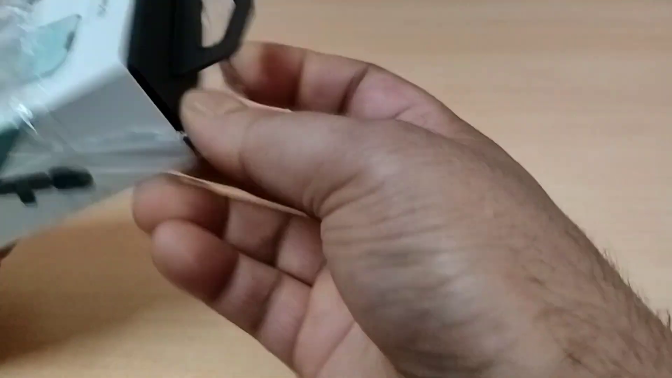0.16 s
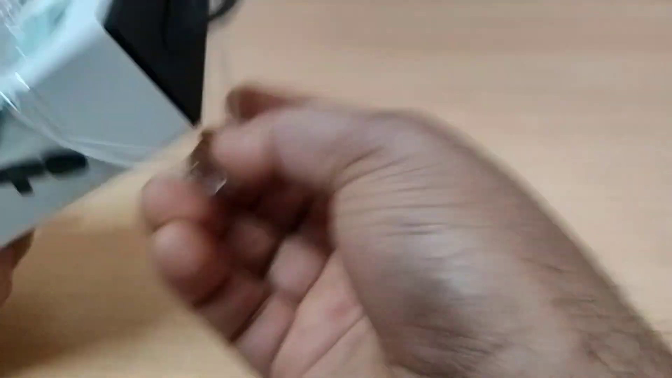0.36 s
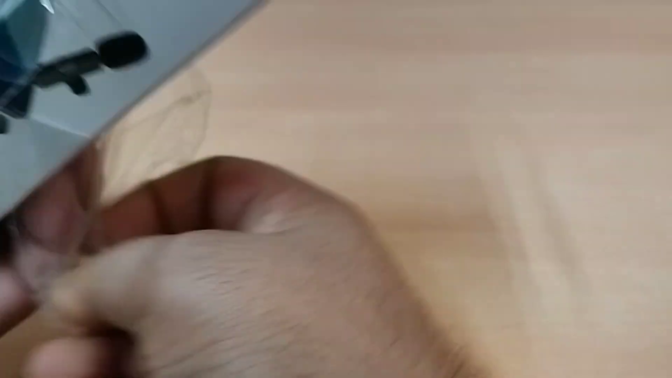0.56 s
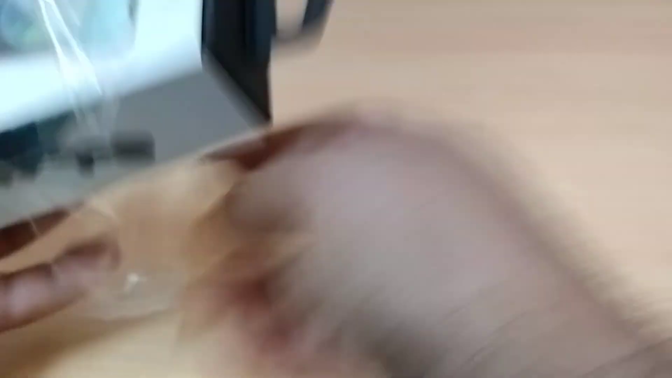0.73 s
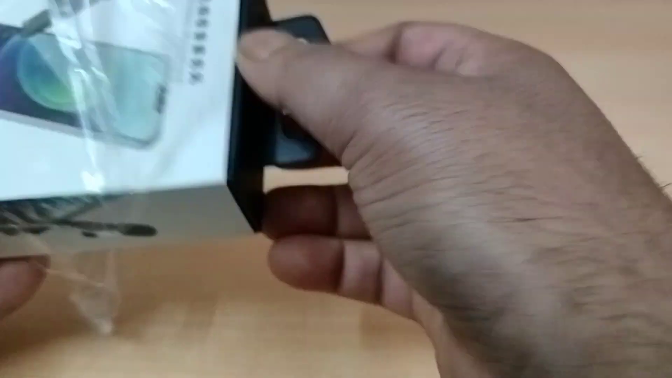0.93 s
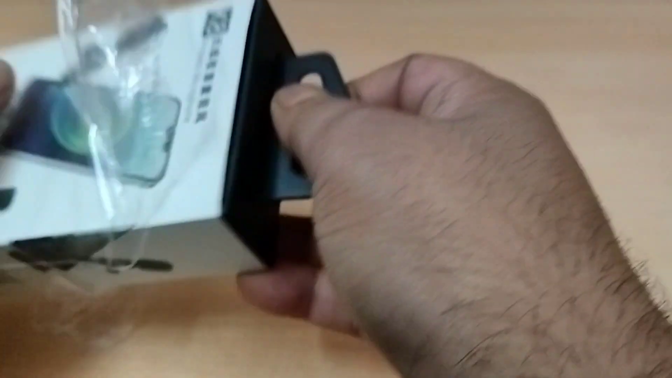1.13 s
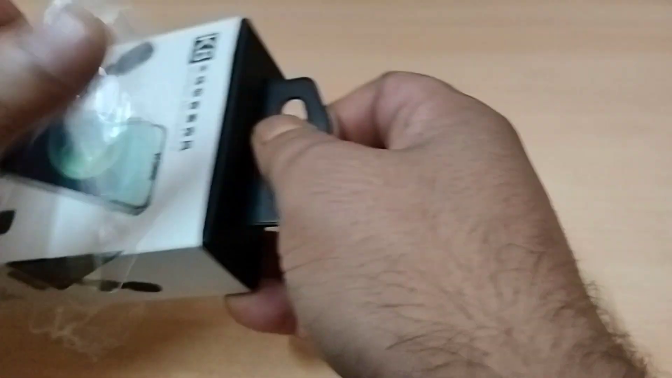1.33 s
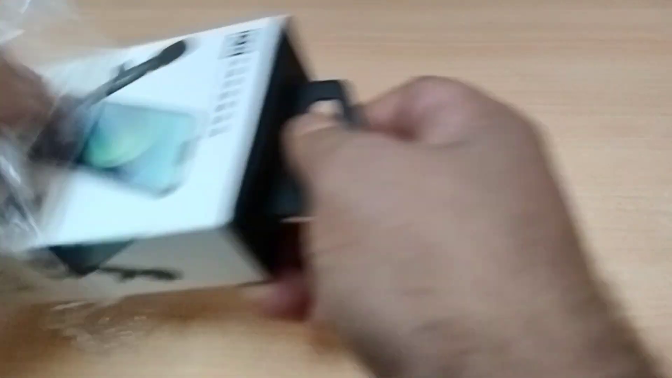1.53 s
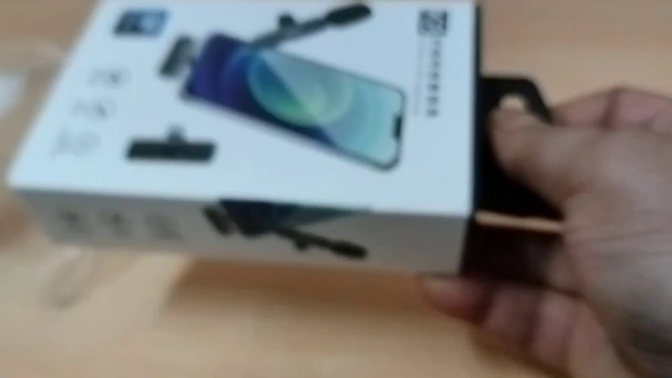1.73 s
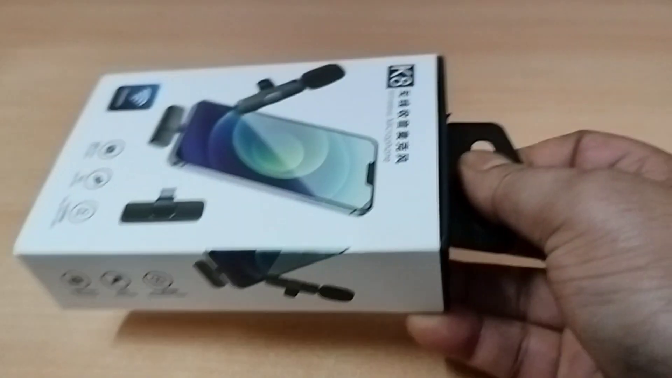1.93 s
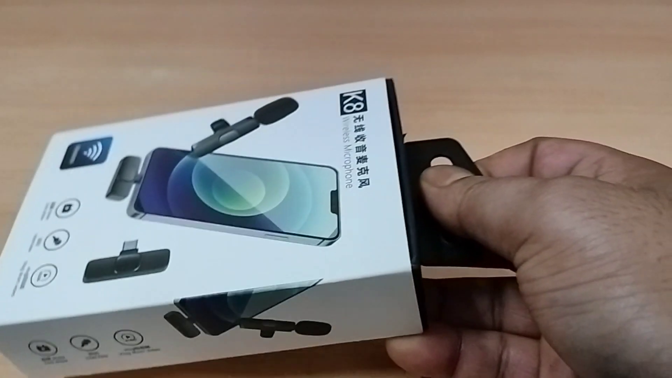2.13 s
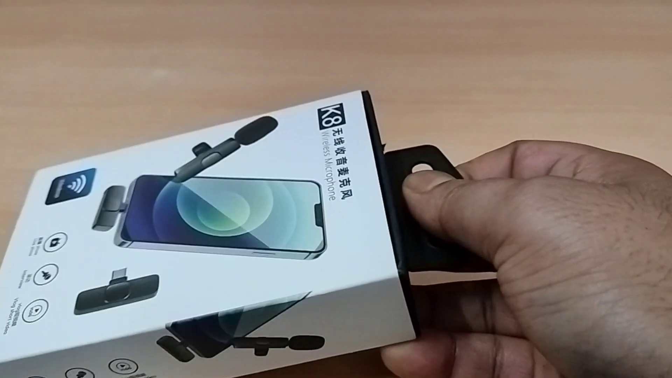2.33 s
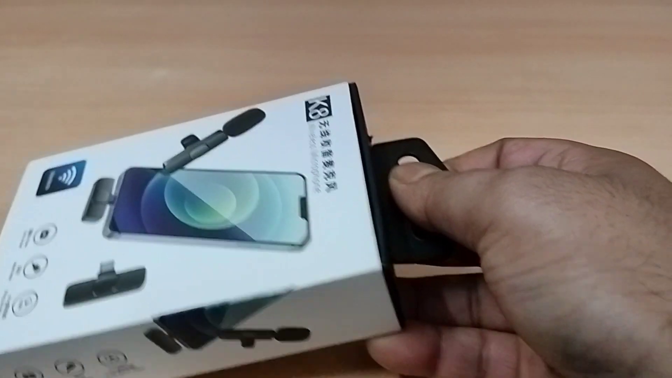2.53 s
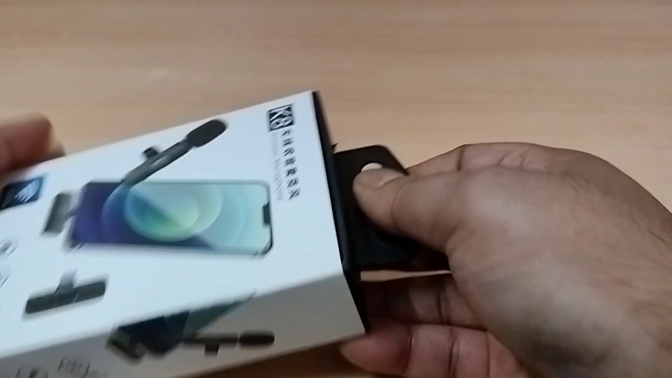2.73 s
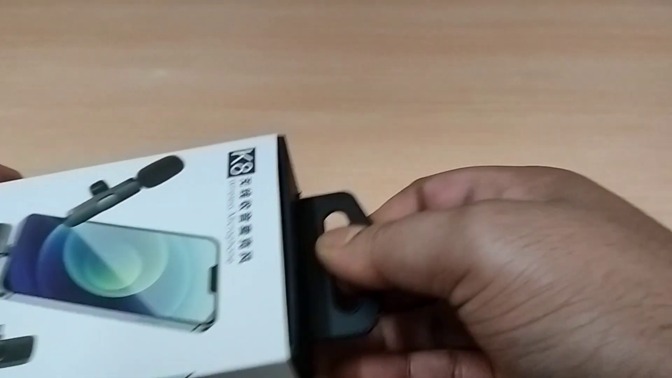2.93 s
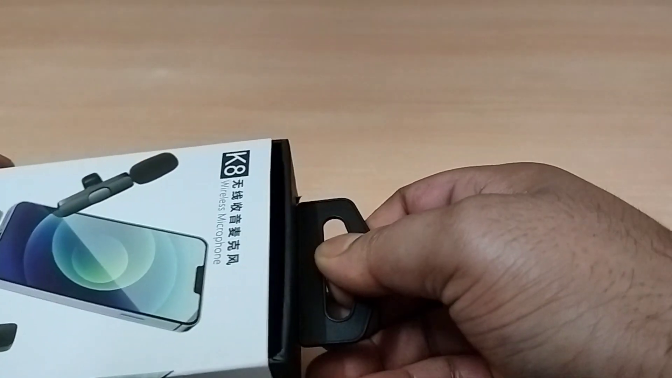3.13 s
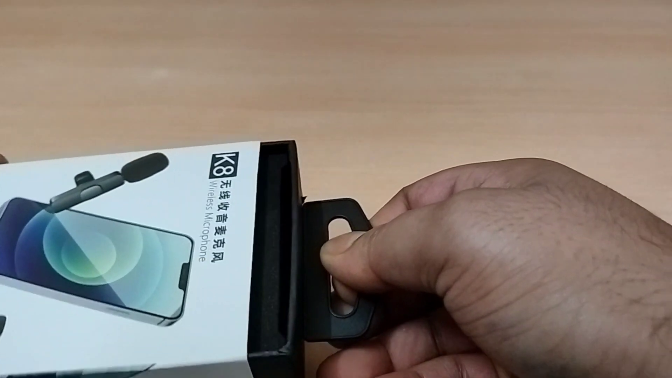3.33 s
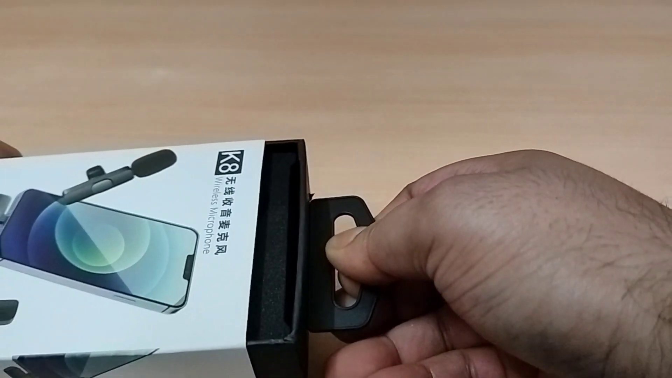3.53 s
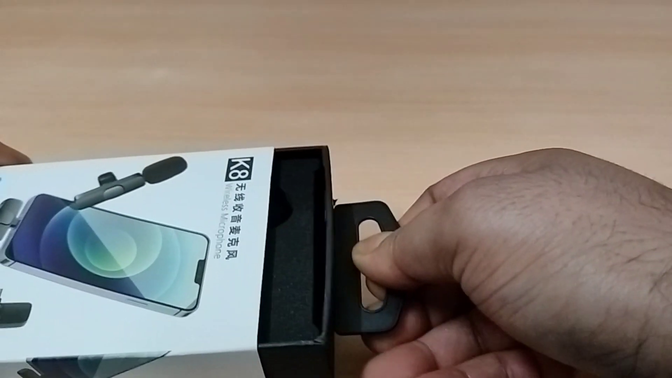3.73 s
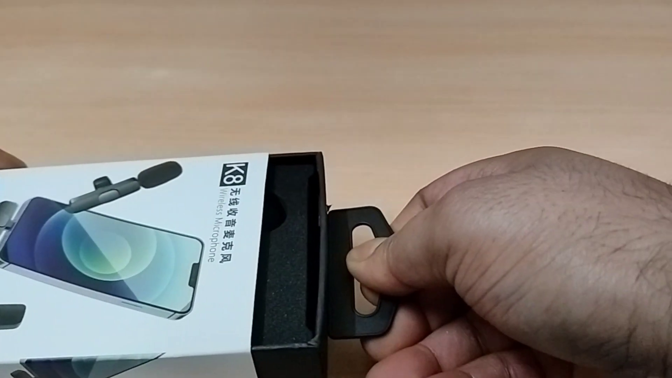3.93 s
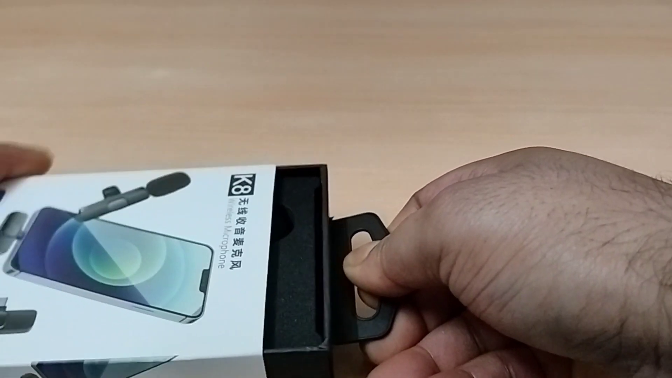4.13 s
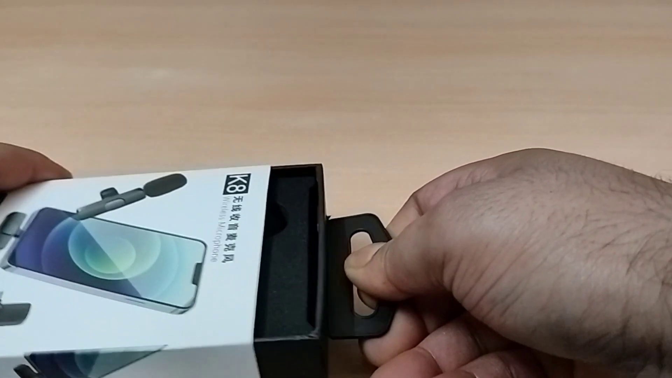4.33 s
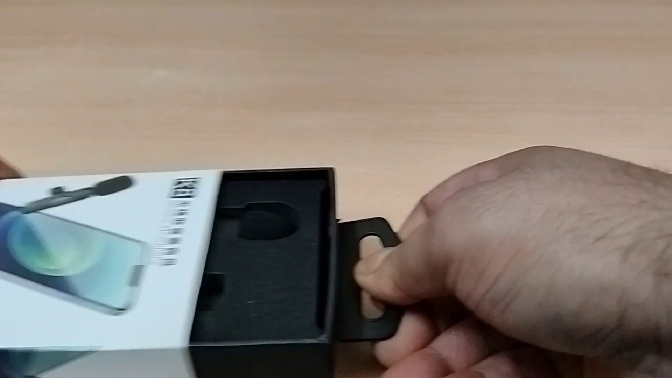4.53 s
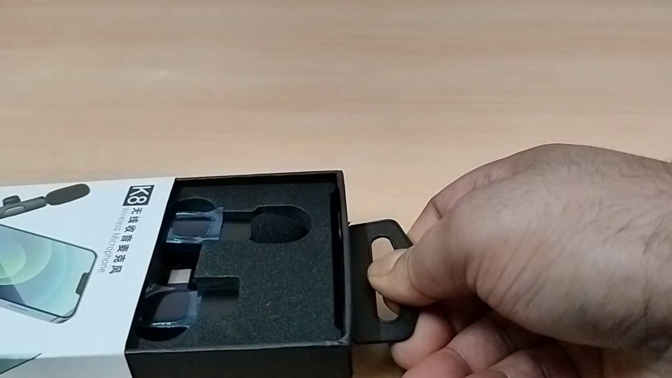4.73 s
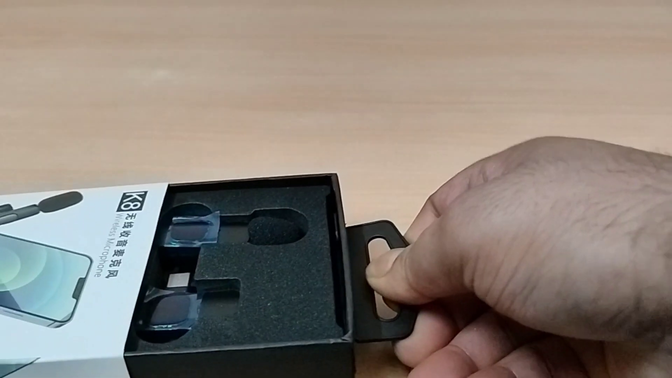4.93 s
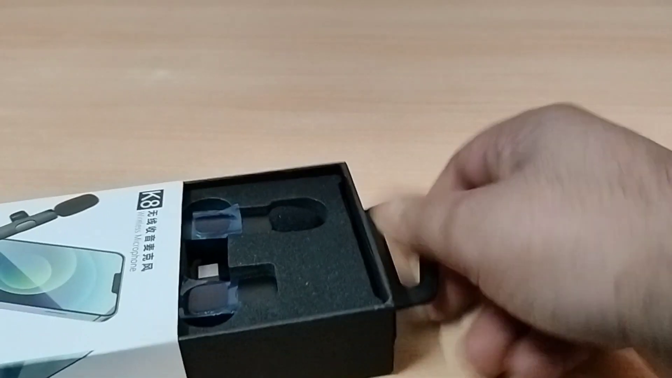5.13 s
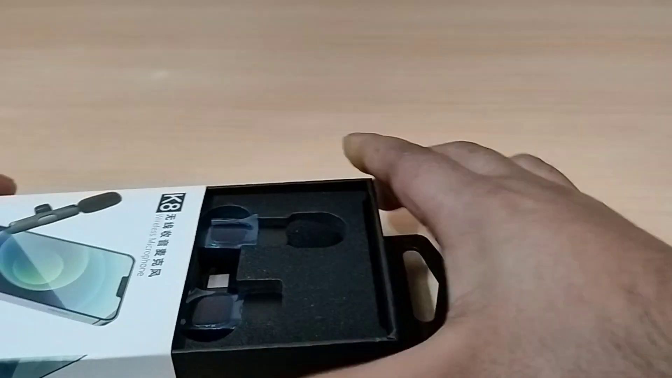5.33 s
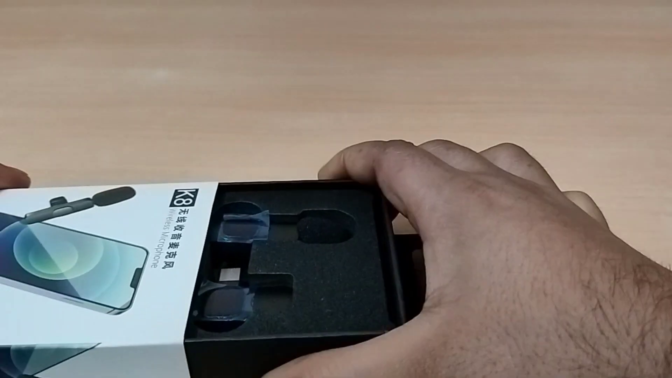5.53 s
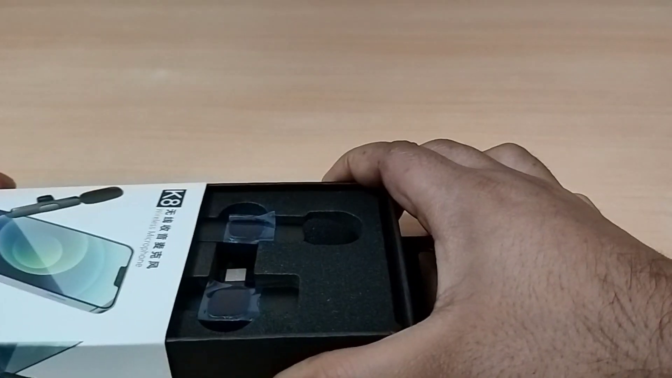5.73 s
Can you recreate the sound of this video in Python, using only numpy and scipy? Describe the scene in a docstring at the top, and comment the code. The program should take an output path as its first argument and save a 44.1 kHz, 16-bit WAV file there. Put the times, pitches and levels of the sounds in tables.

```python
"""Hands pull plastic wrap off a small cardboard box: the film crackles and snaps, and the box rings.
In the first second, puffs of air buffet the right microphone port. From 1.5 s the box bumps the table.
From 2.8 s the tray rasps out of its sleeve, with a faint deep throb under the first strokes, finger taps
on the cardboard and a thin whistle near 4 s. A fan motor hums in the quiet room throughout."""
import sys
import numpy as np
from scipy import signal
from scipy.fft import rfft, irfft
from scipy.io import wavfile

SR = 44100
rng = np.random.default_rng(int(sys.argv[2]) if len(sys.argv) > 2 else 0)


def unload_wav(signal):
    """Save mono or channel-first audio to the path in sys.argv[1] as 16-bit WAV at rate SR, clipped to [-1, 1]."""
    wavfile.write(
        sys.argv[1],
        SR,
        np.round(np.clip(np.atleast_2d(signal).T, -1, 1) * 32767).astype(np.int16),
    )


N = 254368
WRAP_PAN_DB, TRAY_PAN_DB, FAN_PAN_DB = -4.5, -5, -5.5   # left minus right: all sit a little to the right

# The bright tone of the film. Each row: frequency in Hz, level in dB.
FILM_SPECTRUM = [(1200, -44), (1900, -19.5), (2180, -8), (3000, -9), (3500, -6.5), (4960, -11), (5800, -10),
                 (6600, -23.5), (7500, -20.5), (16000, -19)]
# The hollow modes of the closed box. Each row: pitch in Hz, width in Hz, level in dB.
BOX_MODES = [(712, 78, 1.5), (982, 125, 4.5), (1174, 540, -2), (1900, 350, -13.5), (366, 230, -2),
             (231, 180, -5.5)]
# Handfuls of wrap. Each row: start in seconds, crackle in dB, fade in dB per second,
# box over crackle in dB.
CRUMPLES = [(0.0, -43, 46.5, -2.5), (0.27, -35.5, 306, 6.5), (0.371, -38, 122.5, -4.5),
            (0.42, -42.5, 96.5, -1), (0.49, -39, 59, -4), (0.534, -21, 178.5, -0.5),
            (0.585, -42.5, 137.5, 4), (0.692, -45, 43.5, 4.5), (0.834, -46.5, 260, 8.5),
            (0.93, -54.5, 45, 11.5), (1.24, -53, 88, 4.5), (1.395, -47.5, 259.5, 0.5), (1.49, -38, 60, -1),
            (1.595, -28.5, 119, -0.5), (1.66, -32.5, 101.5, 4), (1.763, -24.5, 296, -8.5),
            (1.95, -45, 110, -4), (2.263, -47.5, 135, 3), (2.301, -74.5, 32, 24.5)]


def wrap():
    """Crumpling film: one stream of uneven crinkles excites both its folds and the box under it."""
    t, rise_s = np.arange(N) / SR, 0.017
    film_power, box_power = 0, 0
    for start, db, fade_db, box_db in CRUMPLES:
        gain = np.clip((t - start) / rise_s, 0, 1) * from_db(db - fade_db * np.maximum(t - start, 0))
        film_power += gain ** 2
        box_power += (gain * from_db(box_db)) ** 2
    clicks = grains(3500, spread_db=0.5, clump_db=6.5, alike=0.31)
    # One fold creases at a time, for about 7 ms, and rings at a pitch of its own.
    active_fold = rng.integers(0, 7, N // 300 + 1).repeat(300)[:N]
    folds = sum(resonate(clicks * (active_fold == k), hz, width_hz=0.15 * hz) / np.sqrt(hz)
                for k, hz in enumerate(np.geomspace(2000, 6300, 7)))
    crinkle = rms_one(colour(rms_one(folds) + 1.2 * rms_one(clicks), FILM_SPECTRUM))
    crackle = soft_contact(crinkle, np.sqrt(film_power), full_db=-40, cut_hz=5760)
    hollow = np.sqrt(box_power) * rms_one(cardboard(clicks, BOX_MODES))
    return (hollow + crackle) * panned(WRAP_PAN_DB)


# Single snaps of the wrap. Each row: start in seconds, level in dB, film pitch in Hz, box send in dB.
SNAPS = [(0.009, -30, 2470, 10), (0.028, -12, 2747, -7.5), (0.068, -13, 2820, -4.5),
         (0.102, -18.5, 2770, -19.5), (0.137, -22.5, 3860, -11), (0.151, -20.5, 2368, -10.5),
         (0.28, -20, 3723, -8), (0.372, -27, 2453, 0.5), (0.381, -43.5, 5110, -15.5),
         (0.395, -26, 3580, -18.5), (0.422, -17, 3780, -6), (0.477, -23, 3520, -2.5),
         (0.493, -21, 4020, -6), (0.507, -16, 3900, 1), (0.525, -26, 4560, -9), (0.54, -1.5, 3880, -16),
         (0.578, -18, 2584, 3), (0.596, -12, 2600, -11), (0.681, -18.5, 3920, -13),
         (0.838, -22.5, 2600, -25), (0.972, -28, 5340, -29), (1.405, -29.5, 2674, -15.5),
         (1.495, -24.5, 2280, 5), (1.517, -16, 3800, -15), (1.533, -24, 4300, -22.5),
         (1.561, -15, 3047, -35), (1.574, -32.5, 2400, 2.5), (1.595, -4.5, 2806, -13),
         (1.603, -1.5, 3108, -6.5), (1.662, -18.5, 2440, 5), (1.688, -27.5, 2500, 9.5),
         (1.725, -32.5, 2510, 15), (1.738, -26.5, 2870, 12.5), (1.747, -22, 3370, -41),
         (1.78, -6.5, 2700, -9), (1.99, -30, 4070, -14), (2.28, -34.5, 3130, -13), (3.2, -46, 6650, -29)]


def snaps():
    """Each snap is a few cycles at the film's pitch, a broad crack and a knock into the box."""
    full_db, dull_hz = -5.5, 6300   # snaps weaker than full_db lose treble above dull_hz
    ping, hard, gentle, knock = np.zeros((4, 2, N))
    t = np.arange(600) / SR
    lagged = np.maximum(t - np.array([[0.00004], [0]]), 0)   # the left port is a little further away
    ping_shape = (1 - np.exp(-lagged / 0.00012)) * np.exp(-lagged / 0.0007)
    crack_shape = np.exp(-t / 0.00067) + 0.069 * np.exp(-t / 0.0046)   # sharp break, then splinters
    bursts = rng.standard_normal((len(SNAPS), 2, len(t)))
    bursts[:, :, 0] = 3.0   # the break itself is one hard click
    for (start, db, hz, box_db), burst in zip(SNAPS, bursts):
        gain = from_db(db) * panned(WRAP_PAN_DB)
        force = min(from_db(db - full_db), 1) ** 2
        place(ping, start, gain * np.sin(2 * np.pi * hz * lagged) * ping_shape)
        place(hard, start, force * gain * burst * crack_shape)
        place(gentle, start, (1 - force) * gain * burst * crack_shape)
        jolt = burst[0] + 0.11 * burst   # nearly the same at both ports
        place(knock, start, from_db(box_db) * gain * jolt * np.exp(-t / 0.0026))
    crack = colour(hard + butter(gentle, 4, dull_hz), FILM_SPECTRUM)
    return from_db(-0.5) * ping + from_db(7) * crack + from_db(12.5) * cardboard(knock, BOX_MODES)


# The dry tone of rubbed cardboard. Each row: frequency in Hz, level in dB.
SURFACE_SPECTRUM = [(1120, -40), (1900, -19.5), (2350, -15), (2680, -10.5), (3170, -16.5), (3600, -11),
                    (4580, -17.5), (5790, -17.5), (7500, -37.5), (9750, -58), (16500, -120)]
# The modes of the half-open sleeve. Each row: pitch in Hz, width in Hz, level in dB.
SLEEVE_MODES = [(950, 76, 7.5), (1300, 129, 1.5), (1806, 18, 0), (734, 97, -2.5)]
# Pulls on the tray. Each row: start in seconds, length in seconds, closing hiss level in dB,
# swell over the stroke in dB, sleeve ring over hiss in dB.
STROKES = [(2.818, 0.12, -55.5, 9.5, 4.5), (2.968, 0.02, -53, 12, 2), (3.142, 0.12, -56.5, 9.5, 2.5),
           (3.33, 0.079, -52, 0.5, 3.5), (3.474, 0.045, -58, -7.5, 2), (3.714, 0.095, -52, 1.5, 3.5),
           (3.847, 0.22, -80.5, -13.5, 9), (4.109, 0.063, -68.5, -1.5, 6.5), (4.183, 0.068, -70, -6, 8),
           (4.279, 0.053, -66.5, 5, 8), (4.385, 0.079, -75.5, 4.5, -1), (4.508, 0.2, -43.5, 8.5, 1.5),
           (4.877, 0.028, -55.5, 0, 1), (5.073, 0.094, -64.5, -3.5, -3.5), (5.186, 0.12, -74.5, 2.5, 3),
           (5.506, 0.036, -58.5, 6, 2.5), (5.707, 0.092, -46, 12, 4.5)]


def tray():
    """The tray grips, slides and lets go: dense fibre contacts hiss and ring the sleeve."""
    grip_s, let_go_s = 0.027, 0.0068
    t, hiss_gain, ring_gain = np.arange(N) / SR, 0, 0
    for start, length, db, swell_db, ring_db in STROKES:
        edges = np.clip((t - start) / grip_s, 0, 1)
        edges *= np.exp(-np.maximum(t - start - length, 0) / let_go_s)
        gain = edges * from_db(db - swell_db * np.clip(1 - (t - start) / length, 0, 1))
        hiss_gain += gain
        ring_gain += gain * from_db(ring_db)
    clicks = grains(14000, spread_db=0, clump_db=1.2, alike=0.37)
    ring = butter(cardboard(clicks, SLEEVE_MODES), 3, 680, "high")
    hiss = soft_contact(rms_one(colour(clicks, SURFACE_SPECTRUM)), hiss_gain, full_db=-46, cut_hz=4800)
    return (ring_gain * rms_one(ring) + hiss) * panned(TRAY_PAN_DB)


# Fingers on the cardboard. Each row: start in seconds, ring level in dB, pitch in Hz, tick level in dB.
TAPS = [(2.87, -38, 890, -61), (2.884, -35, 826, -53.5), (2.908, -33, 880, -43.5), (2.922, -27.5, 774, -42),
        (3.336, -43, 900, -50), (3.734, -42.5, 920, -46.5), (3.808, -38.5, 1300, -45),
        (3.878, -39, 830, -69.5), (4.205, -50.5, 1290, -53.5), (4.236, -57, 1360, -71),
        (4.588, -31.5, 964, -55), (4.863, -44.5, 995, -63.5), (5.171, -47, 926, -67),
        (5.277, -55, 864, -67), (5.531, -46.5, 950, -56.5), (5.715, -40, 987, -62)]


def taps():
    """A fingertip makes a dull, dry tick and briefly rings two modes of a cardboard panel."""
    rise_s, ring_s, tick_s = 0.00076, 0.0038, 0.0022
    overtone_ratio, overtone_db = 1.722, -10.5
    out, t = np.zeros(N), np.arange(900) / SR
    grit = rng.standard_normal((len(TAPS), len(t))) * np.exp(-t / tick_s)
    ticks = butter(colour(grit, SURFACE_SPECTRUM)[:, :len(t)], 4, 3900)
    for (start, db, hz, tick_db), tick in zip(TAPS, ticks):
        phase = 2 * np.pi * hz * t
        modes = np.sin(phase) + from_db(overtone_db) * np.sin(overtone_ratio * phase)
        ring = modes * (1 - np.exp(-t / rise_s)) * np.exp(-t / ring_s)
        place(out, start, from_db(db) * ring / ring.max() + from_db(tick_db) * tick / np.abs(tick).max())
    return out * panned(TRAY_PAN_DB)


# Soft thuds. Each row: start in seconds, level in dB, pitch in Hz, left minus right in dB.
BUMPS = [(1.486, -33, 361, 1), (1.52, -34, 184, -6), (1.548, -35, 174, -4), (1.597, -30, 226, -8),
         (1.631, -30, 290, 2), (1.661, -34.5, 311, -12.5), (1.772, -24, 240, -1.5), (1.887, -47, 168, -19),
         (4.311, -45.5, 245, -4)]


def bumps():
    """The box bumps the table with a few dull, low cycles."""
    out = np.zeros((2, N))
    for start, db, hz, pan_db in BUMPS:
        place(out, start, soft_pulse(db, hz, cycles=2.5) * panned(pan_db))
    return out


# The fader ride of the turbulence. Each row: time in seconds, level in dB.
TURBULENCE_LEVELS = [(0.22, -65), (0.246, -31.5), (0.528, -28.5), (0.55, -18.5), (0.842, -32), (0.95, -51)]
# Single puffs of air. Each row: start in seconds, level in dB, pitch in Hz.
PUFFS = [(0.253, -13, 106), (0.3, -20.5, 113), (0.345, -16, 118), (0.419, -30, 210), (0.448, -7.5, 174),
         (0.546, -8, 139), (0.574, -20, 162), (0.586, -6.5, 206), (0.606, -2, 190), (0.625, -9, 232),
         (0.642, -16.5, 153), (0.716, -14, 145), (0.732, -17.5, 134), (0.797, -12, 142),
         (0.814, -15.5, 118)]


def air():
    """Air buffets the right port: lumpy low turbulence and puffs of a cycle or two."""
    lumps = rng.standard_normal(N) * from_db(3 * drift(25))
    out = rms_one(butter(lumps, 2, [70, 240], "band")) * automation(TURBULENCE_LEVELS)[0]
    for start, db, hz in PUFFS:
        place(out, start, soft_pulse(db, hz, cycles=1.05))
    return out * [[0.01], [1]]


# The fader ride of the whistle. Each row: time in seconds, level in dB.
WHISTLE_LEVELS = [(3.84, -79), (4.22, -81)]


def whistle():
    """A faint thin whistle: noise passed twice through one narrow resonance."""
    hz, width_hz = 3780, 220
    once = resonate(rng.standard_normal((2, N)), hz, width_hz)
    return automation(WHISTLE_LEVELS)[0] * rms_one(resonate(once, hz, width_hz))


# A swell of sub-bass. Each row: start in seconds, level in dB, pitch in Hz.
THROB = [(2.7, -59, 39.7)]


def throb():
    """One deep tone swells and passes in the centre."""
    out = np.zeros(N)
    for start, db, hz in THROB:
        place(out, start, soft_pulse(db, hz, cycles=11))
    return out


# The motor's chord. Each row: multiple of the turning rate, level against the hum in dB.
MOTOR_LINES = [(7, -21.5), (9, -14), (10, -17), (12, -6), (13, -6), (16, -20), (18, -22)]
# The tone of the rumble before its upper lift. Each row: frequency in Hz, level in dB.
RUMBLE_SPECTRUM = [(15, -54), (25, -33.5), (45, -12), (80, -18), (170, -9), (300, -7), (400, -7.5),
                   (520, -15), (720, -10.5), (950, -13), (1960, -27.5), (3790, -35), (7000, -56.5),
                   (9100, -95)]
# The rumble is narrow in the bass, wide on top. Each row: frequency in Hz, left-right likeness (0 to 1).
RUMBLE_LIKENESS = [(60, 0.97), (290, .82), (640, 0.44), (1400, 0.03), (6000, .02)]
# The bed swells and fades. Each row: time in seconds, hum in dB, rumble in dB, deepest motor line in dB.
FAN_LEVELS = [(0.0, -53.5, -43, -56.5), (0.65, -41.5, -57, -54.5), (1.2, -52.5, -54, -58),
              (1.7, -48, -43.5, -57), (2.1, -49.5, -51, -58.5), (2.55, -54, -54, -62),
              (3.03, -46, -52.5, -56), (3.6, -56, -59.5, -66), (3.85, -49.5, -57, -59.5),
              (4.1, -54, -64.5, -66.5), (4.4, -53, -59.5, -64), (4.85, -51.5, -63.5, -61.5),
              (5.31, -61, -70.5, -67), (5.77, -53, -55, -68.5)]


def fan():
    """A fan motor hums in wavering harmonics of its turning rate, over the rumble of the room."""
    turn_hz, lift_db, lift_above_hz = 24.5, 2, 180
    hum_gain, rumble_db, deep_db = automation(FAN_LEVELS)
    turn = 2 * np.pi * np.cumsum(turn_hz * (1 + 0.00018 * drift(0.93))) / SR
    shared_waver_db, hum = 0.43 * drift(6), 0
    for multiple, db in MOTOR_LINES:
        gain = np.sqrt(2) * from_db(db + 2.9 * drift(8.9) + shared_waver_db)
        hum += gain * np.sin(multiple * turn + rng.uniform(0, 2 * np.pi))
    deep_line = np.sqrt(2) * from_db(deep_db + 3.5 * drift(11)) * np.sin(4 * turn)
    hz = np.arange(N // 2 + 1) * SR / N + 1
    alike = at_hz(RUMBLE_LIKENESS, hz)
    mid, side = rfft(rng.standard_normal((2, N)))
    stereo = np.sqrt(1 + alike) * mid + np.sqrt(1 - alike) * side * [[1], [-1]]
    spectrum = from_db(at_hz(RUMBLE_SPECTRUM, hz)) * stereo
    noise = irfft(spectrum, N)
    upper = irfft(spectrum / (1 + (lift_above_hz / hz) ** 6), N)
    rumble = (noise + upper * (from_db(lift_db) - 1)) / np.std(noise)
    rumble *= from_db(rumble_db + 2.6 * drift(6.5))
    return (hum_gain * hum + deep_line + rumble) * panned(FAN_PAN_DB)


def walls(x, t60_s):
    """Wall reflections: a dull, decaying noise tail of its own for each port."""
    t = np.arange(round(0.5 * SR)) / SR
    tail = rng.standard_normal((2, len(t))) * from_db(-60 * t / t60_s) * (t > 0.003)
    tail = butter(tail, 2, 4500)
    return signal.fftconvolve(x, tail / np.sqrt(np.sum(tail ** 2) / 2), axes=1)[:, :N]


def cardboard(x, modes):
    """Hollow cardboard: parallel resonances of alternating sign, with little bass or treble."""
    rung = sum((-1) ** k * from_db(db) * resonate(x, hz, width)
               for k, (hz, width, db) in enumerate(modes))
    return butter(rung, 3, [300, 2200], "band")


def soft_contact(x, gain, full_db, cut_hz):
    """Applies the gain; gentle contact loses treble, crossing to a low-passed copy below full_db."""
    force = np.sqrt(np.clip(gain / from_db(full_db), 0, 1))
    return gain * (force * x + (1 - force) * butter(x, 3, cut_hz))


def grains(per_s, spread_db, clump_db, alike):
    """Clumped random clicks heard at both ports, each port with a strength of its own."""
    sizes = from_db(spread_db * np.minimum(rng.exponential(1, N), 4))
    hits = rng.random(N) < per_s * from_db(clump_db * drift(40)) / SR
    return sizes * hits * (alike * rng.standard_normal(N) + (1 - alike) * rng.standard_normal((2, N)))


def soft_pulse(db, hz, cycles):
    """A sine under a bell curve about that many cycles wide."""
    t = np.arange(round(2 * cycles / hz * SR)) / SR
    return from_db(db) * np.sin(2 * np.pi * hz * t) * np.exp(-3 * (t * hz / cycles - 0.9) ** 2)


def drift(rate_hz):
    """A slow random wander of rms 1."""
    hop, settle = 40, 2000
    knots = rng.standard_normal(N // hop + settle + 2)
    r = np.exp(-2 * np.pi * rate_hz * hop / SR)
    slow = signal.lfilter([1], [1, -2 * r, r * r], knots)[settle:]
    return np.interp(np.arange(N) / hop, np.arange(len(slow)), rms_one(slow))


def automation(rows, fade_s=0.0047):
    """Timed rows as curves; the first turns from dB to gain and falls silent outside the table."""
    times, db, *rest = np.transpose(rows)
    t = np.arange(N) / SR
    gate = np.interp(t, [times[0] - fade_s, times[0], times[-1], times[-1] + fade_s], [0, 1, 1, 0])
    return [from_db(np.interp(t, times, db)) * gate] + [np.interp(t, times, column) for column in rest]


def colour(x, spectrum):
    """Causal (minimum-phase) filter with the given spectrum."""
    size = 4096
    hz = np.arange(size // 2 + 1) * SR / size + 1
    cepstrum = irfft(np.log(from_db(at_hz(spectrum, hz))))
    cepstrum[1:size // 2] *= 2
    cepstrum[size // 2 + 1:] = 0
    impulse = irfft(np.exp(rfft(cepstrum)))
    return signal.fftconvolve(x, impulse[None], axes=1)[:, :N]


def resonate(x, hz, width_hz):
    """A two-pole resonance with gain 1 at its peak."""
    r = np.exp(-np.pi * width_hz / SR)
    poles = [1, -2 * r * np.cos(2 * np.pi * hz / SR), r * r]
    return signal.lfilter([(1 - r * r) / 2, 0, (r * r - 1) / 2], poles, x + 1e-18)


def butter(x, order, hz, kind="low"):
    """A flat low-, high- or band-pass filter."""
    return signal.sosfilt(signal.butter(order, hz, kind, fs=SR, output="sos"), x)


def at_hz(points, hz):
    """A curve read on a log-frequency axis."""
    point_hz, values = np.transpose(points)
    return np.interp(np.log(hz), np.log(point_hz), values)


def place(out, start_s, sound):
    """Mixes a sound into out at its start time."""
    i = round(start_s * SR)
    out[..., i:i + sound.shape[-1]] += sound[..., :N - i]


def panned(db):
    """Left and right gains for a left-minus-right difference."""
    return from_db([[db / 2], [-db / 2]])


def from_db(db):
    """dB to gain."""
    return np.exp(np.asarray(db) * np.log(10) / 20)


def rms_one(x):
    """Scaled to rms 1."""
    return x / np.sqrt(np.mean(x ** 2) + 1e-20)


def scene():
    """Hands on wrap, box and tray in the room, air on the port, the fan behind."""
    hands = wrap() + tray() + snaps() + whistle()
    return hands + taps() + from_db(-10) * walls(hands, t60_s=0.29) + air() + bumps() + throb() + fan()


def record(dry):
    """The microphone path: rounded peaks, bass and treble roll-off, faint self-noise, a cut top."""
    roll_off_hz, leak_db, self_noise_db, cutoff_hz = 7120, -26.5, -92, 16300
    rounded = butter(np.tanh(dry), 2, 35, "high")
    dull = signal.sosfilt(signal.cheby1(6, 0.5, roll_off_hz, fs=SR, output="sos"), rounded)
    wet = dull + from_db(leak_db) * rounded   # a little treble gets past
    wet += from_db(self_noise_db) * rng.standard_normal((2, N))
    return signal.sosfilt(signal.cheby2(12, 60, cutoff_hz, fs=SR, output="sos"), wet)


dry = scene()
out = record(dry)
unload_wav(out)
```